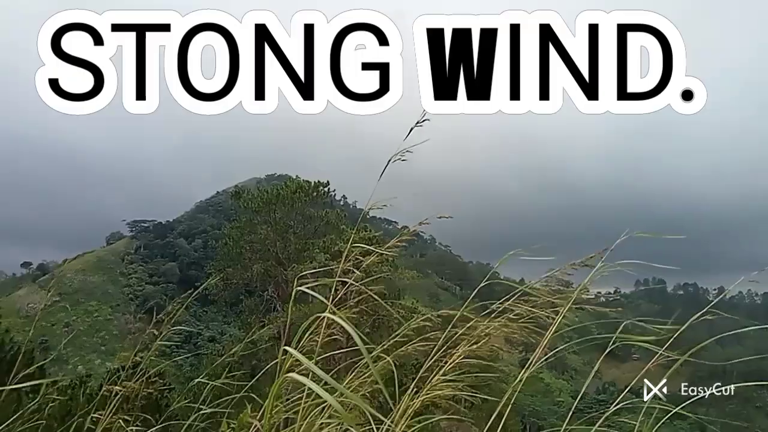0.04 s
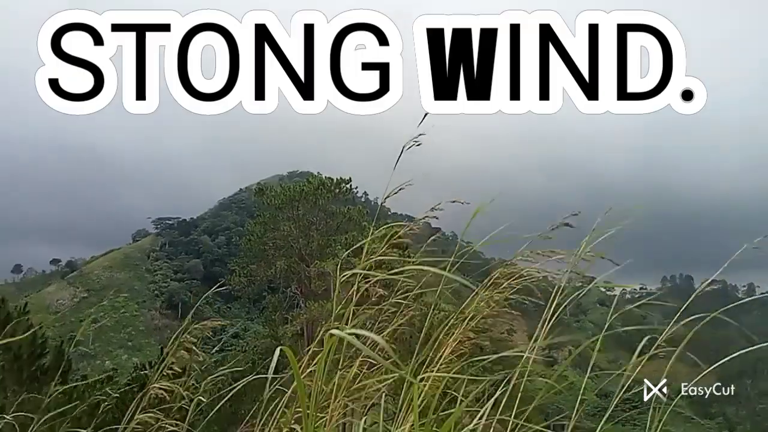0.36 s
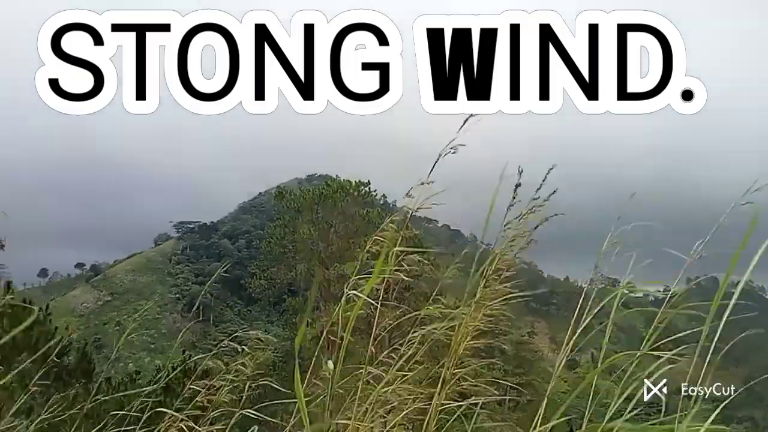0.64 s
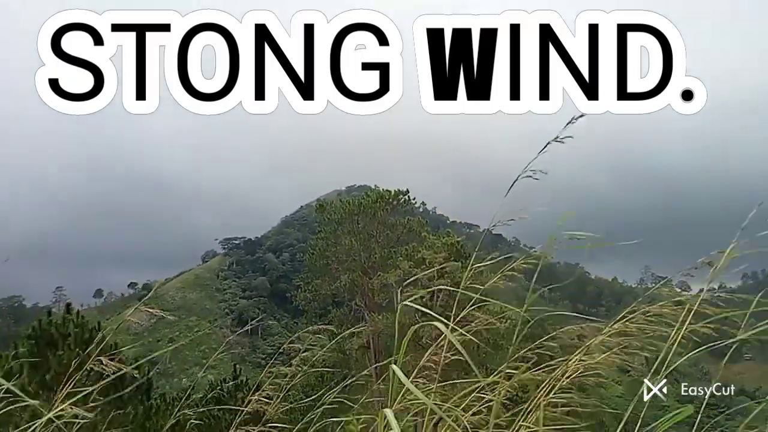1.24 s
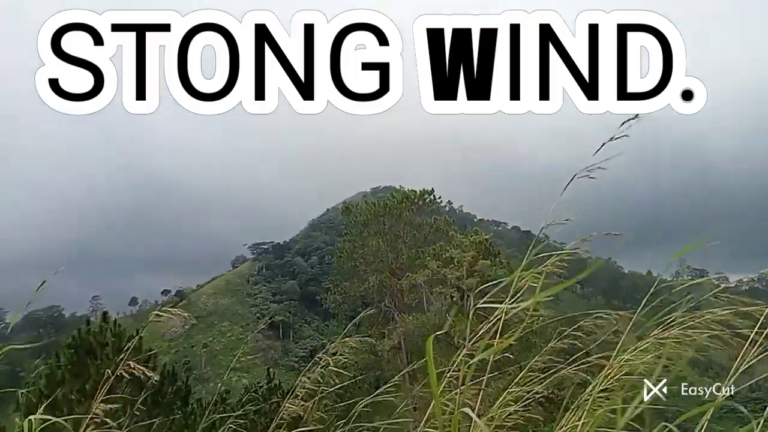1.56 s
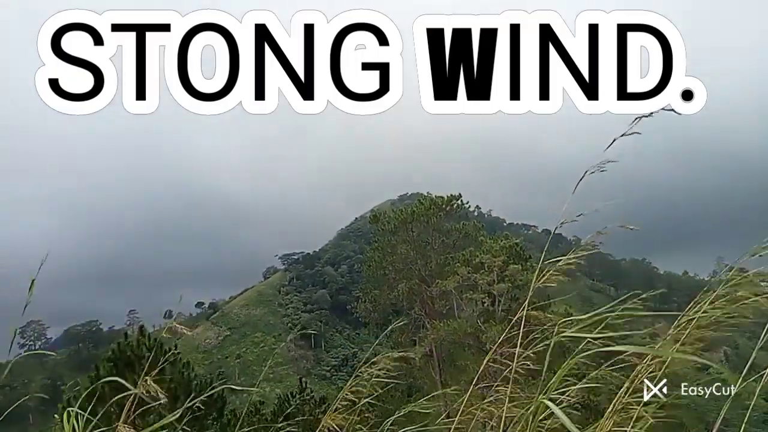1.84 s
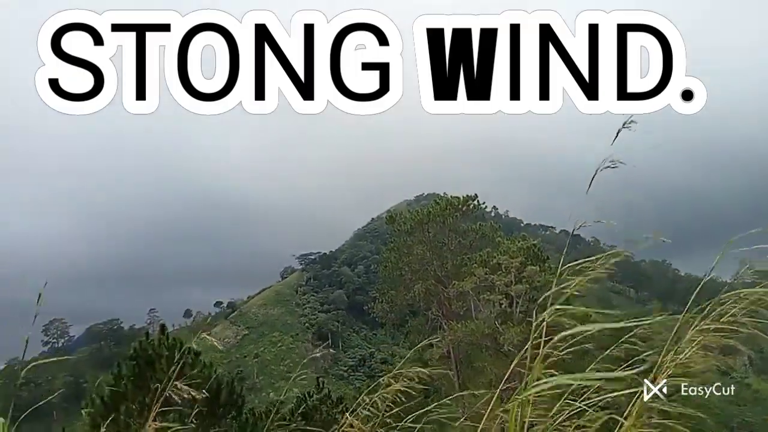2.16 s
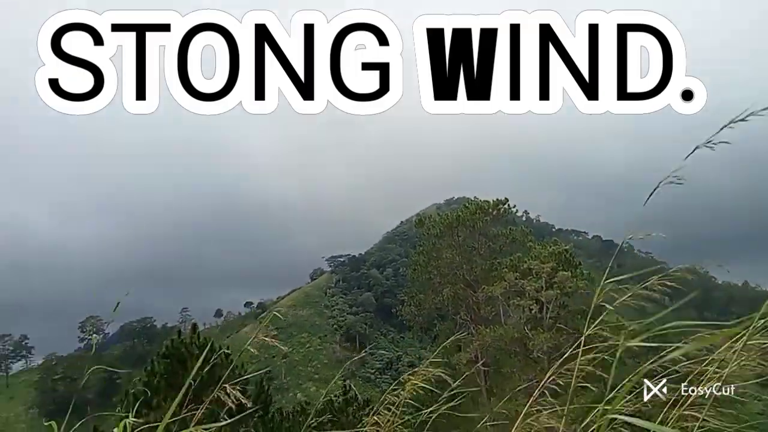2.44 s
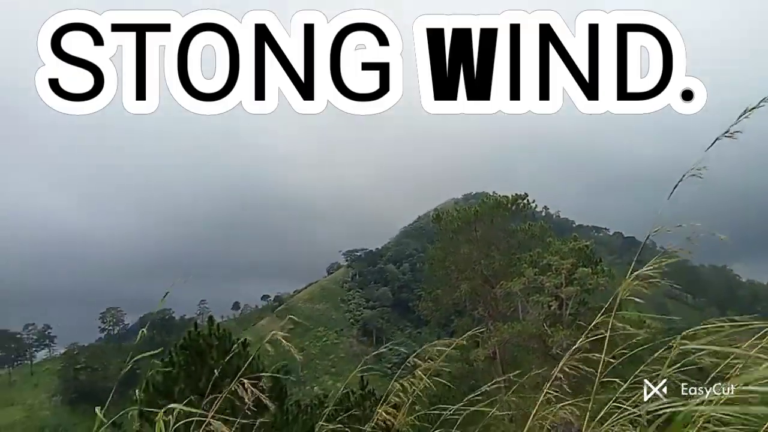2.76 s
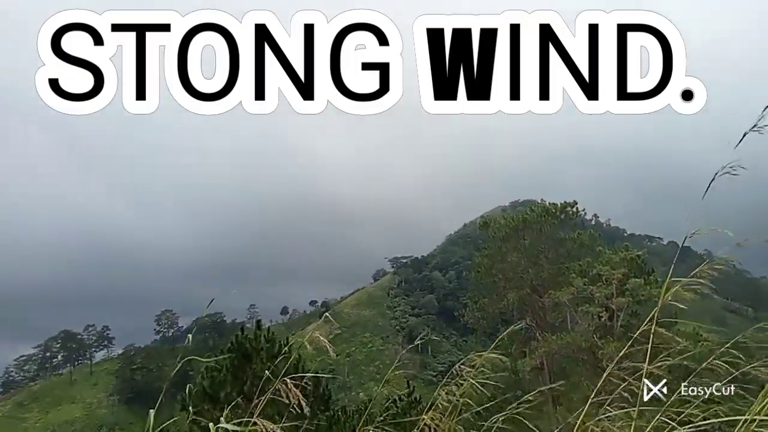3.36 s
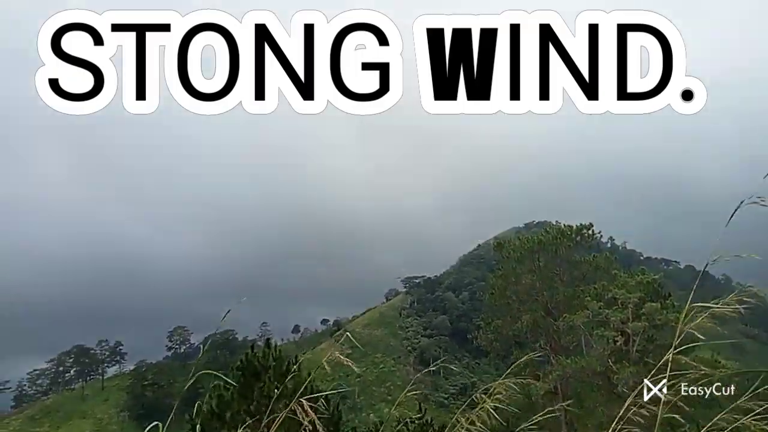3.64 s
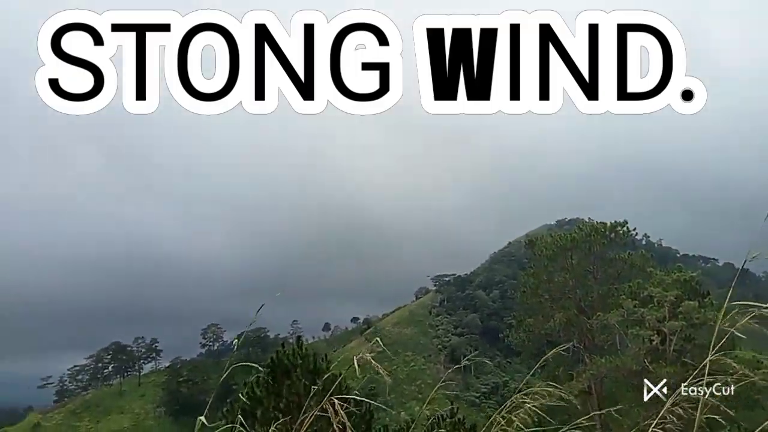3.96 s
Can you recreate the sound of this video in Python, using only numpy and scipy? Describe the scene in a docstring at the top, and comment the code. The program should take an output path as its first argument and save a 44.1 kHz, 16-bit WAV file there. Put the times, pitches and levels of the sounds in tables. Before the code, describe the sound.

Gusty wind thuds and flutters on the microphone over a soft rustle of grass.

```python
"""A grassy hillside in strong wind.
Gusts sweep eddies across the microphone: large ones thud, small ones make a tearing flutter that
brightens as the air speeds up, and late on single eddies slap it. Behind the wind, tall grass and
leaves hiss, dry blades tick and brush together, and a few faint chirps come from far off."""
import sys
import numpy as np
from scipy import signal
from scipy.fft import rfft, irfft
from scipy.io import wavfile
from scipy.ndimage import uniform_filter1d, minimum_filter1d

SR = 44100
rng = np.random.default_rng(int(sys.argv[2]) if len(sys.argv) > 2 else 0)


def waveform_to_disk(signal):
    """Save audio, clipped to [-1, 1], as 16-bit WAV at the path in sys.argv[1]."""
    frames = np.transpose(np.atleast_2d(signal))
    scaled = np.clip(frames, -1, 1) * 32767
    samples = np.round(scaled).astype(np.int16)
    wavfile.write(sys.argv[1], SR, samples)


N = 176400
TIME_S = np.arange(N) / SR
BIN_HZ = np.fft.rfftfreq(N, 1 / SR)


def amp(db):
    """Decibels to gain."""
    return 10 ** (np.asarray(db) / 20)


def unit_rms(x):
    """Scales to rms 1."""
    return x / np.sqrt(np.mean(x ** 2) + 1e-20)


def smooth(x, samples):
    """Moving average, applied twice."""
    return uniform_filter1d(uniform_filter1d(x, samples), samples)


def curve(rows):
    """Time table at every sample, corners rounded."""
    return smooth(np.interp(TIME_S, *np.transpose(rows)), 160)


def at_hz(rows, hz):
    """Frequency table interpolated on a log axis."""
    row_hz, values = np.transpose(rows)
    return np.interp(np.log(hz + 1), np.log(row_hz + 1), values)


def wobble(low_hz, high_hz):
    """Random motion of rms 1 between two rates."""
    in_band = (BIN_HZ > low_hz) & (BIN_HZ < high_hz)
    return unit_rms(irfft(rfft(rng.standard_normal(N)) * in_band, N))


def steadied(x, span_s):
    """Evens out swells longer than the span to rms 1; quick ones remain."""
    power = smooth(x ** 2, int(span_s * SR))
    return x / np.sqrt(abs(power) + 1e-12)


def turbulence(air, spectra, force_db, light_db=-32, hard_db=-14):
    """Colours air band by band, from its light-wind to its hard-wind spectrum as force rises."""
    hardness = np.clip((force_db - light_db) / (hard_db - light_db), -.3, 1.6)
    spectra, centres_hz = np.array(spectra), np.geomspace(20, 10240, 19)
    air_spectrum, out = rfft(air), np.zeros(N)
    for hz in centres_hz:
        triangle = at_hz(np.c_[centres_hz, centres_hz == hz], BIN_HZ)
        band = irfft(air_spectrum * triangle, N)
        light, hard = at_hz(spectra[:, [0, 1]], hz), at_hz(spectra[:, [0, 2]], hz)
        out += band * amp(light + hardness * (hard - light))
    return out


# Large-eddy pressure. Each row: frequency in Hz, relative density in dB in light wind, in hard wind.
RUMBLE_SPECTRA = [(20, -50, -52), (46, -14.5, -17), (71, 0, -8.5), (113, -1.5, 5.5), (170, -2, 1.5),
                  (249, -10.5, -3.5), (392, -30.5, -7.5), (900, -46.5, -77)]
# Large-eddy envelope. Each row: time in seconds, relative level in dB.
RUMBLE_LEVELS = [(0.0, -18), (0.098, -30.5), (0.132, -20.5), (0.414, -41), (0.45, -27), (0.525, -44),
                 (0.6, -27), (0.672, -44), (0.712, -27.5), (0.905, -20), (0.958, -36), (1.024, -23.5),
                 (1.056, -33), (1.114, -24.5), (1.166, -41), (1.21, -38), (1.288, -55), (1.322, -30.5),
                 (1.374, -20.5), (1.416, -57), (1.506, -51), (1.542, -33), (1.6, -41), (1.622, -28.5),
                 (1.668, -13), (1.706, -27), (1.756, -7), (1.79, -21.5), (1.856, -15.5), (1.908, -38),
                 (1.934, -31), (2.024, -52), (2.066, -34), (2.104, -58), (2.132, -35.5), (2.198, -44),
                 (2.23, -19.5), (2.316, -25.5), (2.338, -28), (2.392, -14), (2.42, -20), (2.466, -8),
                 (2.608, -40), (2.636, -15), (2.696, -36), (2.794, -15), (2.845, -40), (2.868, -15),
                 (2.968, -21), (2.994, -18.5), (3.016, -22), (3.08, -17), (3.106, -24), (3.276, -15.5),
                 (3.304, -23.5), (3.374, -13.5), (3.394, -31), (3.412, -8), (3.452, -30), (3.484, -11.5),
                 (3.576, -15.5), (3.596, -24), (3.73, -21), (3.756, -14), (3.944, -25.5), (4.0, -26.5)]

def rumble(gain_db=-2, floor_db=-55):
    """Large eddies thud on the microphone and never quite stop."""
    level_db = curve(RUMBLE_LEVELS)
    thuds = turbulence(rng.standard_normal(N), RUMBLE_SPECTRA, level_db)
    return steadied(thuds, span_s=0.066) * np.hypot(amp(gain_db + level_db), amp(floor_db))


# Small-eddy pressure. Each row: frequency in Hz, relative density in dB in light wind, in hard wind.
FLUTTER_SPECTRA = [(80, -26, -43), (180, -1, -0.5), (304, 2, 1), (416, -1.5, 2), (620, -10, -2.5),
                   (814, -17, -6.5), (1153, -27, -13), (1990, -44, -24), (3020, -59, -36.5),
                   (4750, -95, -57.5), (9000, -90, -85)]
# Small-eddy envelope. Each row: time in seconds, relative level in dB.
FLUTTER_LEVELS = [(0, -25.5), (.11, -42), (.155, -25), (.18, -61), (.23, -32.5), (.258, -45.5), (.29, -32),
                  (.324, -51), (.392, -43.5), (.425, -54), (.446, -34.5), (.512, -59.5), (.61, -31.5),
                  (.654, -69), (.722, -28), (.76, -38), (.81, -29.5), (.845, -31), (.895, -25),
                  (.935, -31.5), (.955, -28.5), (1.12, -52.5), (1.305, -60), (1.336, -23.5), (1.372, -36),
                  (1.42, -63), (1.6, -56), (1.652, -19), (1.671, -13.5), (1.694, -18), (1.712, -26),
                  (1.738, -10), (1.76, -11), (1.77, -12.5), (1.802, -15.5), (1.815, -16.5), (1.843, -21.5),
                  (1.853, -16.5), (1.916, -66), (2.208, -74), (2.236, -19), (2.264, -33), (2.308, -18),
                  (2.345, -35), (2.392, -11.5), (2.415, -17), (2.462, -11), (2.497, -16), (2.515, -12.5),
                  (2.556, -27.5), (2.574, -21), (2.608, -42), (2.638, -17), (2.658, -29), (2.672, -23.5),
                  (2.705, -75), (2.725, -28.5), (2.8, -16.5), (2.825, -61), (2.852, -42), (2.868, -13.5),
                  (2.906, -15), (2.988, -16.5), (3.05, -19.5), (3.072, -15.5), (3.092, -16.5), (3.102, -27),
                  (3.116, -20), (3.13, -28.5), (3.166, -15.5), (3.186, -20.5), (3.197, -29), (3.222, -14),
                  (3.232, -24.5), (3.244, -14), (3.26, -20.5), (3.277, -16), (3.286, -21), (3.335, -20.5),
                  (3.343, -13.5), (3.36, -20.5), (3.376, -17), (3.4, -28.5), (3.42, -13), (3.446, -15),
                  (3.464, -23.5), (3.48, -15.5), (3.58, -13), (3.595, -21.5), (3.62, -15), (3.645, -19.5),
                  (3.668, -16.5), (3.8, -16), (3.9, -17.5), (4, -21.5)]
# Brightness beyond what the level gives. Each row: time in seconds, extra force in dB.
FLUTTER_BRIGHTNESS = [(0, -6), (.9, -5), (1.35, 1), (1.66, 3), (1.725, -1), (1.742, 8.5), (1.768, -2),
                      (1.795, 4.5), (1.82, 2), (1.853, 8.5), (2.235, -26), (2.35, -3), (2.395, 6.5),
                      (2.415, -2), (2.444, 3), (2.455, 9), (2.465, -0.5), (2.485, 1), (2.52, -10.5),
                      (2.79, -4.5), (2.89, 3.5), (2.93, 8), (2.96, 3), (3.12, 0), (3.43, 0), (3.62, 2.5),
                      (3.78, 10.5), (4, -1.5)]

def flutter(gain_db=0.49, lump_db=2.0, jitter_db=1.5):
    """Small eddies arrive in lumps; faster air is louder and brighter."""
    level_db = curve(FLUTTER_LEVELS) + jitter_db * wobble(19, 90)
    air = rng.standard_normal(N) * amp(lump_db * wobble(40, 300))
    tearing = turbulence(air, FLUTTER_SPECTRA, level_db + curve(FLUTTER_BRIGHTNESS))
    return steadied(tearing, span_s=0.047) * amp(gain_db + level_db)


# Colour of the hiss. Each row: frequency in Hz, relative density in dB.
GRASS_SPECTRUM = [(100, -22), (500, -9), (1000, -11), (1600, -7), (2500, -5), (3100, -1.5), (3600, 1),
                  (4050, -1), (4500, -5), (5200, -5.5), (5650, -3), (6200, 1), (6800, -1.5), (7400, -3.5),
                  (8400, -5), (10000, -10.5), (13000, -13)]
# Level of grass hiss and ticks; dips under loud gusts and sinks late on.
# Each row: time in seconds, relative level in dB.
GRASS_LEVELS = [(0, -46), (.78, -43), (1.55, -43.2), (1.71, -42), (1.75, -46.5), (1.98, -43), (2.15, -42.5),
                (2.37, -43.5), (2.5, -47), (2.65, -44.5), (2.89, -44.5), (2.98, -52), (3.24, -48),
                (3.5, -50), (3.68, -56.5), (4, -58)]

def grass_hiss(gain_db=2.5, patch_db=2.0, flicker_db=0.88):
    """Countless blades rub: a hiss with shifting patches of colour."""
    hz, _, frames = signal.stft(rng.standard_normal((2, N)), SR, nperseg=512, noverlap=384)
    patches = uniform_filter1d(rng.standard_normal(frames.shape[1:]), size=6, axis=0)
    patches = unit_rms(uniform_filter1d(patches, size=20, axis=1))
    colour = amp(at_hz(GRASS_SPECTRUM, hz)[:, None] + patch_db * patches)
    hiss = signal.istft(frames * colour, SR, nperseg=512, noverlap=384)[1][:, :N]
    return unit_rms(hiss) * amp(gain_db + curve(GRASS_LEVELS) + flicker_db * wobble(3.6, 28))


def stem_ticks(gain_db=-12, taps_per_s=430, size_db=4.0, decay_cycles=3.4):
    """Dry stems tap one another, each ringing for a few cycles."""
    t, out = np.arange(400) / SR, np.zeros((2, N))
    pitches_hz = np.geomspace(3000, 12000, 24)
    for hz in pitches_hz:
        taps = rng.random((2, N)) < taps_per_s / len(pitches_hz) / SR
        strength = amp(size_db * np.minimum(rng.exponential(1, (2, N)), 4))
        ring = np.sin(2 * np.pi * hz * t) * np.exp(-t * hz / decay_cycles)
        out += signal.oaconvolve(taps * strength, ring[None], axes=1)[:, :N]
    return unit_rms(out) * amp(gain_db + curve(GRASS_LEVELS))


# Near blades. Each row: peak time in seconds, length in seconds, level in dB, centre in Hz,
# width (sigma) in octaves.
BLADE_BRUSHES = [(.345, .04, -46, 3420, .04), (0.533, .05, -53, 6540, 0.091),
                 (0.778, .09, -46, 10200, 0.41), (1.085, 0.021, -45, 8500, .45),
                 (1.37, 0.037, -43, 6760, 0.17), (1.539, 0.013, -40, 7500, .5),
                 (2.124, .07, -44, 7200, 0.27)]

def blade_brushes():
    """A near blade slides over its neighbour: a short swell of narrow hiss."""
    out = np.zeros((2, N))
    for peak_s, length_s, db, centre_hz, width_oct in BLADE_BRUSHES:
        passband = np.exp(-.5 * (np.log2((BIN_HZ + 1) / centre_hz) / width_oct) ** 2)
        hiss = irfft(rfft(rng.standard_normal((2, N))) * passband, N)
        swell = np.exp(-2 * ((TIME_S - peak_s) / length_s) ** 2)
        out += amp(db) * swell * unit_rms(hiss)
    return out


# Chirps. Each row: start in seconds, length in seconds, peak in dB, start and end pitch in Hz.
FAR_CHIRPS = [(.345, .06, -43.5, 4130, 4090), (1.632, .058, -39, 3180, 3000),
              (2.673, .04, -38.5, 2990, 2840)]

def far_chirps():
    """Perhaps a far bird: thin tones swell, sink a little and fade."""
    out = np.zeros(N)
    for start_s, length_s, db, from_hz, to_hz in FAR_CHIRPS:
        progress = np.clip((TIME_S - start_s) / length_s, 0, 1)
        pitch_hz = from_hz + (to_hz - from_hz) * progress
        out += amp(db) * np.sin(np.pi * progress) * np.sin(2 * np.pi * np.cumsum(pitch_hz) / SR)
    return out


# Single eddies. Each row: centre time in seconds, level in dB before the limiter.
EDDY_SLAPS = [(2.892, -0.5), (2.933, -6), (2.963, -4), (2.991, -8.5), (3.375, -3), (3.416, -10), (3.574, 2),
              (3.619, -3.5), (3.783, -1.5)]

def eddy_slaps(swing_hz=380, skew=0.92):
    """An eddy bursts right on the microphone: one lopsided swing of pressure."""
    out = np.zeros(N)
    for centre_s, db in EDDY_SLAPS:
        stretch = rng.uniform(.8, 1.2)
        phase = np.pi * swing_hz * (TIME_S - centre_s) / stretch
        out += amp(db) * (1 - 2 * phase ** 2 + skew * phase) * np.exp(-phase ** 2)
    return out


# Stereo image of the grass. Each row: frequency in Hz, left-right correlation from 0 to 1.
GRASS_CORRELATION = [(4050, 1), (4300, .4), (8000, .35), (13000, .33)]

def spread(pair):
    """Two unrelated signals become left and right: alike in the bass, wide in the treble."""
    correlation = np.clip(at_hz(GRASS_CORRELATION, BIN_HZ), 0, 1)
    side_gain = np.sqrt((1 - correlation) / (1 + correlation))
    mid, side = pair[0], irfft(rfft(pair[1]) * side_gain, N)
    return np.array([mid + side, mid - side])


def scene():
    """Wind and chirps in the centre, grass all around."""
    wind = rumble() + flutter()
    grass = spread(grass_hiss() + stem_ticks() + blade_brushes())
    return wind + grass + far_chirps() + eddy_slaps()


def record(dry, ceiling=0.91, cutoff_hz=13050):
    """A quick limiter holds down the hardest blasts; a low-pass follows."""
    needed_gain = np.minimum(1, ceiling / (abs(dry).max(0) + 1e-9))
    gain = smooth(minimum_filter1d(needed_gain, size=400), 200)
    lowpass = signal.firwin(801, cutoff_hz, window=("kaiser", 9), fs=SR)
    return signal.oaconvolve(dry * gain, lowpass[None], "same")


dry = scene()
out = record(dry)
waveform_to_disk(out)
```